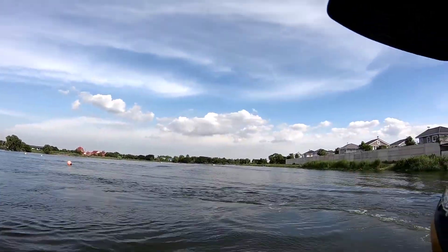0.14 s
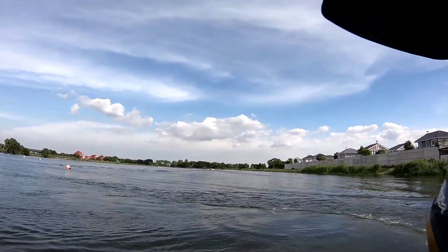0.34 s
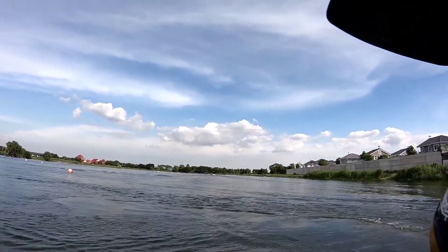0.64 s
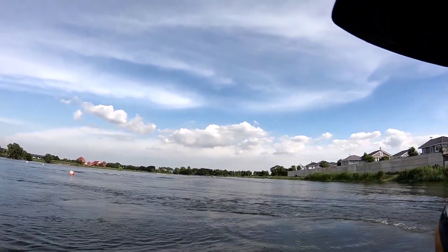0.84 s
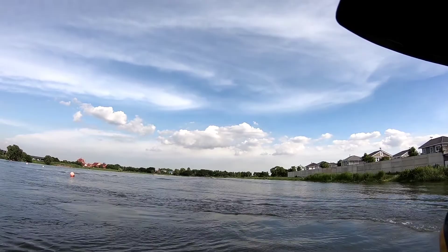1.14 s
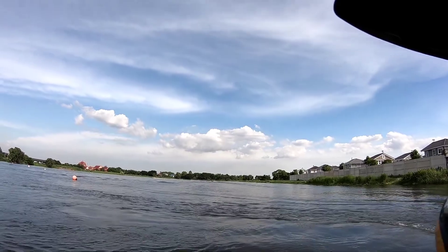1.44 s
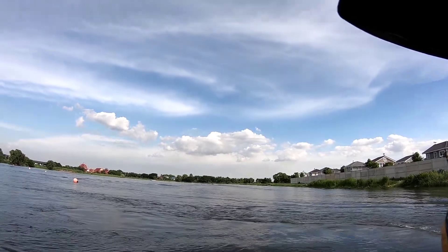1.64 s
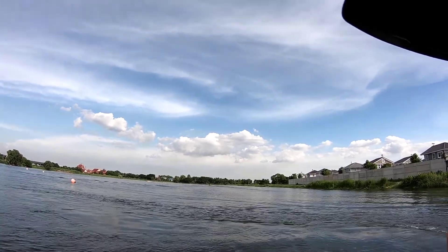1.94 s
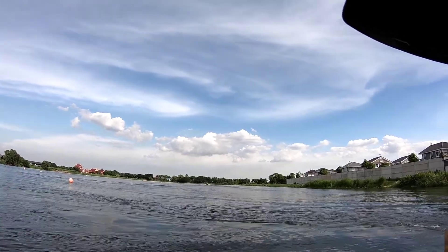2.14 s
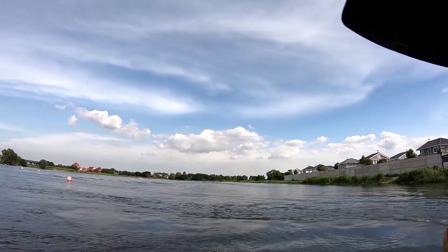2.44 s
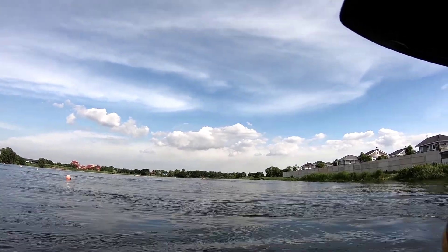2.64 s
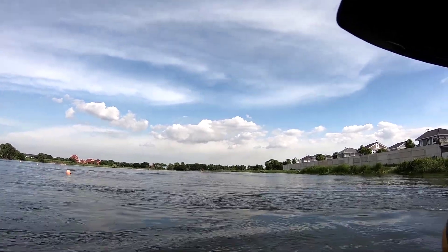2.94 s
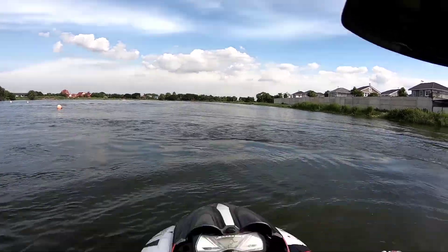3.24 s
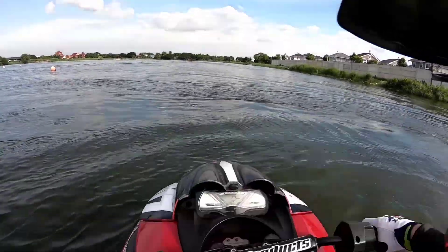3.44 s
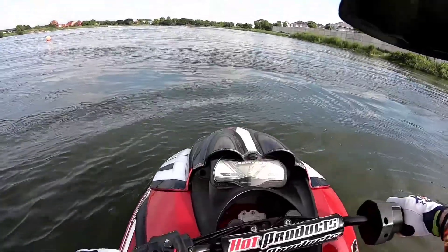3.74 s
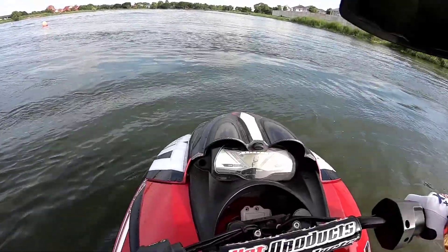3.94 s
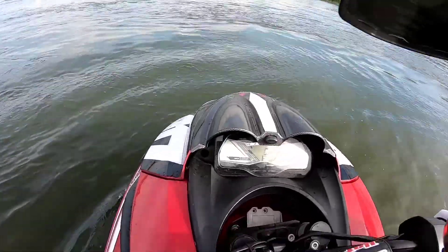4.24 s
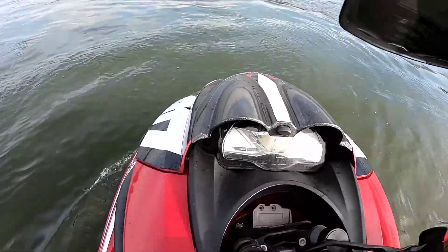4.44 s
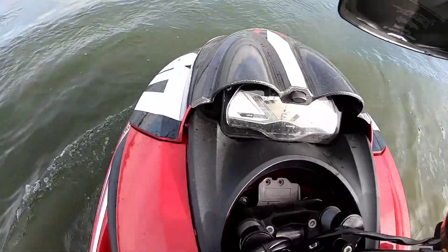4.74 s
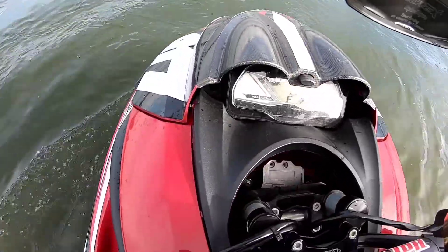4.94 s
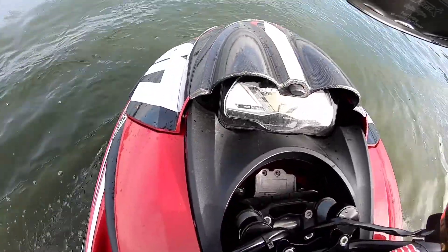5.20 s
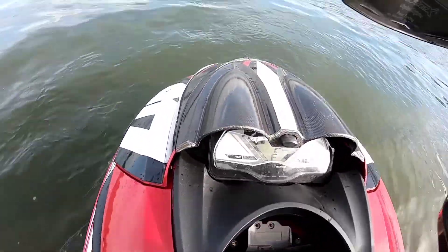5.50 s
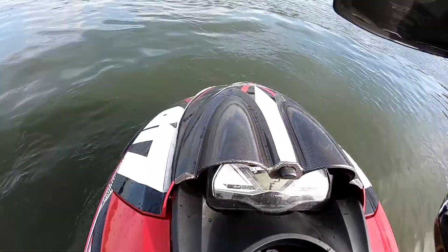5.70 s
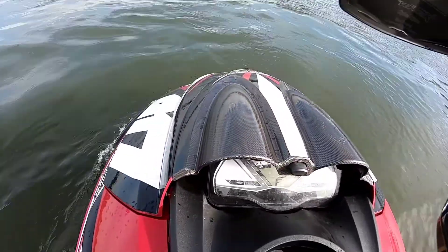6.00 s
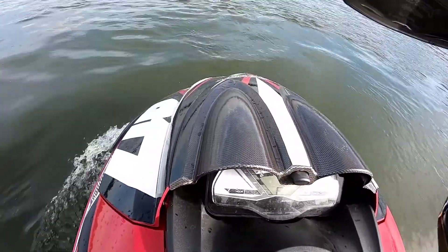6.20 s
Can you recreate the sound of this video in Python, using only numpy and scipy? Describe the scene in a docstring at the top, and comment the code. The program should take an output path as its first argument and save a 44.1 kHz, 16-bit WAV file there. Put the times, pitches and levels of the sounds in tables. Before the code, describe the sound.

From the start, a personal watercraft engine idles with a low, uneven boom and rumble through the hull, heard close from inside a waterproof case worn by the rider. Muffled water washes and bubbles along the sides. A loose fitting buzzes faintly and ticks irregularly on the case, most clearly in the first second and around 2 to 4 seconds, with tiny droplet clicks. Small waves slap the hull, mostly between 1 and 3.2 seconds, with a few more after 4.5. Very brief, faint high squeaks come at about 3.7 and 4.7 seconds. At about 4.1 seconds the throttle opens: the engine stumbles, rises quickly in pitch and grows louder, then smooths out around 5 seconds and keeps climbing to more than double its idle pitch. A faint gear whine joins and hissing spray swells, lasting until the end at about 6.4 seconds.

```python
"""A personal watercraft, heard from inside a waterproof case on the rider's helmet.
At first the four-cylinder engine idles, booming and rumbling in the hull, while water washes and
bubbles along the sides. A loose fitting buzzes and ticks on the case, droplets hit it and small waves
slap the hull; later come a few short squeaks. After about four seconds the throttle opens: the
engine's tones climb through the pitches at which the hull rings, gears whine and the spray swells."""
import sys
import numpy as np
from scipy import signal
from scipy.fft import rfft, irfft, next_fast_len
from scipy.io import wavfile
from scipy.ndimage import uniform_filter1d, map_coordinates

SR = 44100
rng = np.random.default_rng(int(sys.argv[2]) if len(sys.argv) > 2 else 0)


def store_pcm(level_fs):
    """Save levels as 16-bit WAV."""
    pcm = np.round(np.clip(level_fs, -1, 1) * 32767).astype(np.int16)
    wavfile.write(sys.argv[1], SR, np.atleast_2d(pcm).T)


N = 280476

# how hard the engine works: t/s, load/0-1
ENGINE_LOAD = [(0, 0), (4.1, 0.07), (4.4, 0.5), (4.7, 0.83), (5.0, 0.73), (5.4, 0.9), (5.8, 0.7),
               (6.36, 0.8)]
# how unevenly the cylinders burn, stumbling as the throttle opens, then clean: t/s, unevenness/0-1
UNEVEN_BURNING = [(0, .75), (4.2, .7), (4.35, .85), (4.95, .85), (5.12, .2), (6.36, .15)]
# hull panels boost sound near their own pitch: f/Hz, width/Hz, boost/dB
HULL_PANELS = [(126, 15, -3), (170, 23, 8), (230, 10, 1.5), (254, 6.4, 1.5), (321.8, 39, 10.5),
               (414.8, 42, 4), (501, 17, 5.5), (650, 43, 2.5)]
# the tones the loose fitting rings with: f/Hz, relative level/dB, time to fade by 60 dB/s
FITTING_TONES = [(1620, 0, .035), (2480, 2, .038), (2750, -1, .015), (3100, -4, .015), (3450, -2, .035),
                 (6000, -9, .02), (8000, -24, .015)]


def amp(db):
    """Turn decibels into a factor to multiply by."""
    return 10 ** (np.asarray(db) / 20)


def unit(x):
    """Scale x to an average strength (rms) of 1."""
    return x / np.sqrt(np.mean(x ** 2) + 1e-20)


def over_time(points):
    """Join (time, value) points with straight lines, giving one value per sample."""
    times, values = np.transpose(points)
    return np.interp(np.arange(N) / SR, times, values)


def at_pitch(points, hz):
    """Read between (frequency, value) points, with every octave equally wide."""
    freqs, values = np.transpose(points)
    return np.interp(np.log(hz + 1), np.log(freqs + 1), values)


def boost_db(resonances, hz):
    """The decibels that ringing parts together add at each frequency."""
    return sum(db / (1 + (2 * (hz - centre) / width) ** 2) for centre, width, db in resonances)


def wobble(rate):
    """A smooth random curve that passes through `rate` new values a second."""
    steps = np.arange(0, N + 32, 32)
    values = rng.standard_normal(int(N * rate / SR) + 4)
    return np.interp(np.arange(N), steps, map_coordinates(values, [steps * rate / SR]))


def filtered(x, gain):
    """Multiply each frequency in x by gain(frequency)."""
    size = next_fast_len(N + 8192)
    return irfft(rfft(x, size) * gain(np.fft.rfftfreq(size, 1 / SR)), size)[..., :N]


def patchy_noise(depth_db):
    """Hiss that is louder and softer in random patches of time and pitch."""
    spectrum = signal.stft(rng.standard_normal(N + 512), nperseg=512)[2]
    patches = uniform_filter1d(rng.standard_normal(spectrum.shape), size=8, axis=0)
    patches = uniform_filter1d(patches, size=6, axis=1)
    return signal.istft(spectrum * amp(depth_db * unit(patches)), nperseg=512)[1][:N]


def noise_puff(seconds, centre_hz, spread, fade_s, rise_s):
    """A puff of noise around one pitch that fades by 60 dB in fade_s."""
    t = np.arange(round(seconds * SR)) / SR
    edges_hz = [centre_hz / spread, min(centre_hz * spread, SR * .45)]
    band = signal.butter(4, edges_hz, "band", fs=SR, output="sos")
    noise = unit(signal.sosfilt(band, rng.standard_normal(len(t))))
    return noise * amp(-60 * t / fade_s) * (1 - np.exp(-t / rise_s))


def add_at(track, start_s, sound):
    """Mix a sound into the track, cutting off what runs past the end."""
    place = track[round(start_s * SR):][:len(sound)]
    place += sound[:len(place)]


def random_hits(count, top_db):
    """Random (time, level) rows, each up to 8 dB below top_db."""
    chance = rng.random((count, 2))
    return np.c_[chance[:, 0] * N / SR, top_db - 8 * chance[:, 1]]


def crankshaft():
    """The engine's turning shaft: its turns a second, and its slightly unsteady angle in radians."""
    # shaft speed: t/s, f/Hz
    speeds = [(0.0, 42.4), (0.75, 43.1), (1.25, 43.2), (1.6, 41.8), (2.2, 41.9), (2.5, 42.6), (3.05, 41.1),
              (3.5, 42.2), (3.8, 41.8), (4.1, 43.6), (4.25, 49.0), (4.4, 58.0), (4.52, 62.7), (4.8, 63.9),
              (5.1, 69.9), (5.3, 73.3), (5.4, 77.7), (5.6, 80.8), (5.9, 85.3), (6.2, 96.1), (6.36, 98.5)]
    crank_hz = over_time(speeds)
    return crank_hz, 2 * np.pi * np.cumsum(crank_hz * (1 + .003 * wobble(12))) / SR


def engine_boom(crank_hz, angle, load):
    """The hull booms at multiples of the shaft speed; uneven burning makes these tones waver."""
    # main tones: multiple of shaft speed, idle level/dB, full-load level/dB, waver/dB
    strong_tones = [(1, -21.5, -15, 3), (1.5, -33, -24, 4.5), (2, -23, -17.5, 2), (3, -33.5, -28, 6.5),
                    (4, -44, -32.5, 6), (5, -32.5, -48, 2)]
    # weaker tones: multiple of shaft speed, idle level/dB, full-load level/dB
    weak_tones = [(.5, -46, -41), (2.5, -48, -42.5), (3.5, -53, -50), (4.5, -51.5, -45.5),
                  (5.5, -59, -54.5), (6, -61.5, -57.5), (6.5, -53.5, -58), (7, -54.5, -59.5)]
    # how well the hull passes on a low tone: f/Hz, gain/dB
    hull_response = [(43, -11), (63, -11), (68, -12), (71.5, -5), (77, -4), (88, 1), (97, 0.5),
                     (106, -12.5), (126, -6.5), (143, -16.5), (160, -17.5), (172, -15), (183, -8.5),
                     (194, -3), (211, -1), (228, -9), (250, -5), (275, -7), (300, -14), (335, -2),
                     (370, -16), (480, -18)]
    # how strongly the cylinders fire: t/s, relative level/dB
    firing_strength = [(0, -0.5), (.1, 0), (.45, 2), (.6, -3), (1.1, 0.5), (1.4, -1.5), (1.8, 0),
                       (2.2, 0.5), (2.45, -2.5), (2.8, -1.5), (3.05, -10.5), (3.3, -0.5), (3.58, 1),
                       (3.7, -2), (3.8, 0.5), (4.1, 1.5), (4.3, 1.5), (4.55, -2), (4.7, -7.5), (5.04, 0.5),
                       (5.18, 3.5), (6.0, 2), (6.36, -2)]
    firing_db, uneven = over_time(firing_strength), over_time(UNEVEN_BURNING)

    def tone(multiple, idle_db, full_db, gain_db, waver_db):
        db = idle_db + load * (full_db - idle_db) + gain_db + waver_db * uneven * wobble(18)
        drift = 0.5 * (0.57 + 0.44 * uneven) * wobble(9)
        return 2 ** .5 * amp(db) * np.sin(multiple * angle + multiple ** 2 + drift)

    boom = np.zeros(N)
    for multiple, idle_db, full_db, waver_db in strong_tones:
        gain_db = firing_db + at_pitch(hull_response, multiple * crank_hz)
        boom += tone(multiple, idle_db, full_db, gain_db, waver_db)
    for multiple, idle_db, full_db in weak_tones:
        boom += tone(multiple, idle_db, full_db, boost_db(HULL_PANELS, multiple * crank_hz), waver_db=2)
    return boom


def engine_rumble(angle, load):
    """Uneven firings, two to each turn of the shaft, shake the hull with low pulsing noise."""
    # the rumble's tone colour: f/Hz, relative level/dB
    colour = [(13, -41), (22, -10.5), (64, -2.5), (90, 0.5), (109, 2), (135, -2), (209, -3), (260, -11.5),
              (313, -9.5), (900, -29), (1170, -65.5), (1980, -120)]
    puffs = patchy_noise(depth_db=1.15) * (1 + 0.26 * np.cos(2 * angle))

    def hull_gain(hz, panel_weight):
        return amp(at_pitch(colour, hz) + panel_weight * boost_db(HULL_PANELS, hz))

    rumble = unit(filtered(puffs, lambda hz: hull_gain(hz, 0.17)))
    ringing = unit(filtered(puffs, lambda hz: hull_gain(hz, 9.8) * (hz > 380)))
    rumble += 0.1 * load * ringing  # hard firings set the higher-pitched panels ringing
    evenness = 1 - over_time(UNEVEN_BURNING)
    rumble -= .4 * evenness * filtered(rumble, lambda hz: hz < 450)  # even burning thins the bass
    return amp(-29 + 5 * load + wobble(8)) * rumble


def bubbles(count, centre_hz, cycles, spread_db):
    """Bubbles ring at random times, each rising in pitch as it dies away."""
    when, pitch = rng.random(count), rng.standard_normal(count)
    strength = amp(spread_db * np.minimum(rng.exponential(size=count), 3))[:, None]
    hz = np.clip(centre_hz * np.exp(.6 * pitch), 700, 9000)[:, None]
    t = np.arange(500) / SR
    envelope = np.exp(-hz * t / cycles) * (1 - np.exp(-hz * t))
    rings = strength * envelope * np.sin(2 * np.pi * hz * t * (1 + 0.011 * hz * t))
    places = (when * N).astype(int)[:, None] + np.arange(500)
    return unit(np.bincount(places.ravel(), rings.ravel(), N + 500)[:N])  # adds them all up


def water_wash():
    """Water sloshes along the hull with small bubbles in it."""
    # strength of the wash: t/s, level/dB
    wash_levels = [(0, -46), (.5, -47.5), (1.1, -46.5), (1.35, -48.5), (2.3, -44.5), (2.75, -46.5),
                   (3.3, -43.5), (3.55, -46.5), (3.75, -44.5), (4.18, -46), (4.4, -43.5), (5.4, -43.5),
                   (5.7, -44), (6.36, -44)]
    slosh = amp(0.65 * wobble(9.6) + 0.21 * wobble(22))
    rush = patchy_noise(depth_db=1.95)
    fizz = 0.15 * bubbles(count=4000, centre_hz=2192, cycles=2.5, spread_db=1)
    return amp(over_time(wash_levels)) * slosh * (rush + fizz)


def spray_and_intake(load):
    """Spray and the intake hiss, faintly at idle and louder as the engine works harder."""
    hiss = amp(.7 * wobble(9.3) + 0.59 * wobble(34)) * patchy_noise(depth_db=1.0)
    spray = filtered(hiss, lambda hz: 1 / (1 + (9000 / (hz + 1)) ** 6))
    intake = filtered(hiss, lambda hz: 1 / (1 + ((hz - 5800) / 900) ** 4))
    return amp(-50 + 20.4 * load) * spray + amp(-57.5 + 16 * load) * intake


def fitting_buzz(load, level_db):
    """The idling engine shakes the loose fitting in fits; its longest-ringing tones build up most."""
    def ring_gain(hz):
        return sum(amp(db) * fade_s ** 2 / (1 + ((hz - tone_hz) * fade_s / 2) ** 2)
                   for tone_hz, db, fade_s in FITTING_TONES)

    chatter = amp(3.5 * wobble(20) - 6 * load) * rng.standard_normal(N)
    return amp(level_db) * unit(filtered(chatter, ring_gain))


def fitting_ticks(faint_count, faint_db):
    """The loose fitting knocks on the case: a crack and a short ring, never quite the same twice."""
    # the firm knocks: t/s, relative level/dB
    firm_ticks = [(0.184, -32), (0.381, -29), (0.478, -31), (0.5154, -33), (0.654, -29), (1.5958, -31.5),
                  (1.726, -37), (1.97, -30), (2.687, -31), (2.8428, -26), (3.1583, -33.5), (3.3513, -28.5),
                  (3.9297, -29), (4.143, -36), (4.376, -29.5), (5.138, -33)]
    # the third number turns down the ringing above 2000 Hz, in dB
    ticks = [(start, db, -7.5) for start, db in firm_ticks]
    ticks += [(start, db, -3.5) for start, db in random_hits(faint_count, faint_db)]
    out, t = np.zeros(N), np.arange(round(SR / 16)) / SR
    noise = unit(filtered(rng.standard_normal(N), lambda hz: (hz > 1400) & (hz < 3700)))
    noise = np.pad(noise, (0, SR))
    attack = 1 - np.exp(-t / 0.00037)
    for start, db, treble_db in ticks:
        ring = np.zeros(len(t))
        for hz, tone_db, fade_s in FITTING_TONES:
            envelope = amp(tone_db + (hz > 2000) * treble_db + rng.normal(0, 0.67) - 60 * t / fade_s)
            ring += envelope * np.sin(2 * np.pi * hz * (1 + rng.normal(0, 0.017)) * t)
        crack = 0.5 * noise[round(start * SR):][:len(t)] * amp(-60 * t / 0.047)
        add_at(out, start, amp(db - 8.5) * (ring + crack) * attack)
    return out


def droplets(faint_count, faint_db):
    """Droplets hit the case with tiny bright clicks; faint ones fall at random."""
    # the main droplets: t/s, relative level/dB
    main_drops = [(1.4124, -43), (1.927, -44), (2.6896, -39), (3.1754, -51), (3.3463, -44), (3.4954, -53.5),
                  (4.3024, -51)]
    out = np.zeros(N)
    for start, db in [*main_drops, *random_hits(faint_count, faint_db)]:
        click = noise_puff(.03, centre_hz=6300, spread=1.32, fade_s=.018, rise_s=.0008)
        add_at(out, start, amp(db - 10) * click)
    return out


def wave_slaps():
    """Small waves slap the hull, each gurgling around its own pitch."""
    # the slaps: t/s, relative level/dB, centre f/Hz
    slaps = [(0.985, -26, 646), (1.1, -29, 832), (1.171, -36, 1180), (1.458, -29.5, 1220),
             (1.505, -37, 614), (2.081, -31, 1330), (2.338, -28, 1200), (2.805, -25.5, 1220),
             (2.829, -26.5, 624), (2.934, -32, 1060), (3.228, -30, 724), (4.559, -26, 635),
             (5.089, -28, 670), (5.879, -28, 600)]
    out = np.zeros(N)
    for start, db, hz in slaps:
        add_at(out, start, amp(db - 5) * noise_puff(.2, hz, spread=1.35, fade_s=0.11, rise_s=.008))
    return out


def squeaks():
    """Brief sliding whistles close by, each trailed by a spit of noise."""
    # the whistles: t/s, length/s, start f/Hz, end f/Hz, relative level/dB
    whistles = [(3.725, 0.023, 3400, 4700, -44.5), (3.735, 0.0093, 5720, 6300, -37.5),
                (4.716, 0.0072, 6080, 6000, -35.5), (4.721, 0.019, 6150, 7660, -45),
                (4.735, .012, 5400, 5140, -48), (4.75, 0.011, 6080, 5970, -41.5)]
    out = np.zeros(N)
    for start, length, start_hz, end_hz, db in whistles:
        samples = round(length * SR)
        cycles = np.cumsum(np.linspace(start_hz, end_hz, samples)) / SR
        add_at(out, start, amp(db - 3.5) * np.hanning(samples) * np.sin(2 * np.pi * cycles))
        spit = noise_puff(.1, (start_hz + end_hz) / 2, spread=1.1, fade_s=0.097, rise_s=0.0019)
        add_at(out, start, amp(db - 5) * spit)
    return out


def gear_whine(angle):
    """Gears sing at high multiples of the shaft speed, each tone swelling and fading in its own time."""
    # gear tones: multiple of shaft speed, start t/s, end t/s, relative level/dB
    gear_tones = [(60, 4.12, 4.47, -69), (80, 4.22, 4.42, -67), (80, 4.75, 5.6, -64), (86, 4.8, 5.6, -66),
                  (70, 5.1, 6.7, -65), (110, 5.2, 5.6, -64), (140, 5.85, 6.5, -59), (160, 5.2, 5.5, -58)]
    whine, t = np.zeros(N), np.arange(N) / SR
    for multiple, start, end, db in gear_tones:
        progress = np.clip((t - start) / (end - start), 0, 1)
        swell = np.sin(np.pi * progress) ** 0.32
        whine += swell * amp(db + 2.2 * wobble(35)) * np.sin(multiple * angle + 1.9 * wobble(120))
    return whine


def block_buzz(angle, load):
    """Working hard, the engine's metal block buzzes at many multiples of the shaft speed."""
    buzz = np.zeros(N)
    for multiple in range(8, 30):
        strength = load ** 2 * amp(-78 + 2.5 * wobble(9))
        buzz += strength * np.sin(multiple * angle + multiple ** 2 + 1.3 * wobble(30))
    return buzz


def through_case(sound):
    """The sealed case dulls sound that comes through the air, and the air pockets inside it ring."""
    # what the case wall lets through: f/Hz, relative gain/dB
    wall = [(290, -16.5), (500, 0.5), (900, -8), (1650, -8.5), (2260, -12.5), (3430, -14), (4840, -23.5),
            (6100, -22), (6500, -25), (7140, -36), (8270, -40), (9320, -49.5), (10900, -60.5),
            (12000, -46.5), (12600, -45), (15500, -52.5)]
    # ringing air pockets: f/Hz, width/Hz, boost/dB
    air_pockets = [(1107, 540, 5.5), (1760, 100, 3), (2460, 17, 1.5), (3550, 150, -4), (6160, 410, 3)]

    def gain(hz):
        return amp(at_pitch(wall, hz) + boost_db(air_pockets, hz))

    average_gain = np.sqrt(np.mean(gain(np.linspace(0, SR / 2, 4000)) ** 2))
    return filtered(sound, gain) / average_gain


def scene():
    """Boom, knocks and squeaks arrive through solid parts; water and whine cross the air and the case."""
    load = over_time(ENGINE_LOAD)
    crank_hz, angle = crankshaft()
    solid = engine_boom(crank_hz, angle, load) + engine_rumble(angle, load)
    whine = gear_whine(angle) + block_buzz(angle, load)
    solid += wave_slaps() + squeaks() + droplets(faint_count=50, faint_db=-50.5)
    solid += fitting_ticks(faint_count=260, faint_db=-42.5) + fitting_buzz(load, level_db=-60.5)
    airborne = water_wash() + spray_and_intake(load) + amp(12) * whine
    return (solid + amp(1) * through_case(airborne))[None]


def record(dry):
    """Cut away the very highest treble."""
    return filtered(dry, lambda hz: hz < 15650)


dry = scene()
out = record(dry)
store_pcm(out)
```